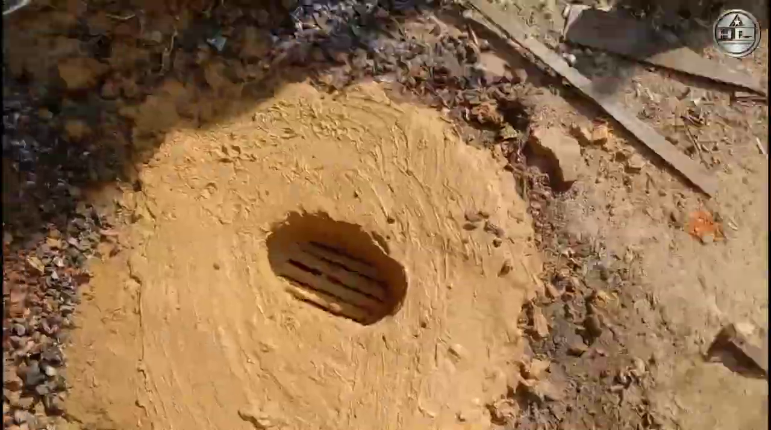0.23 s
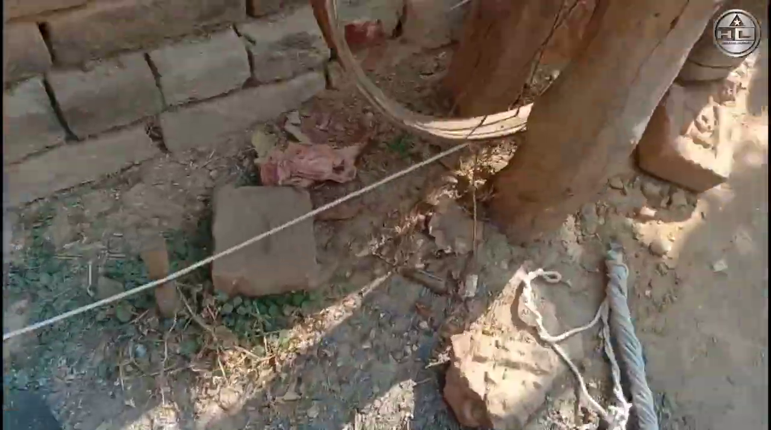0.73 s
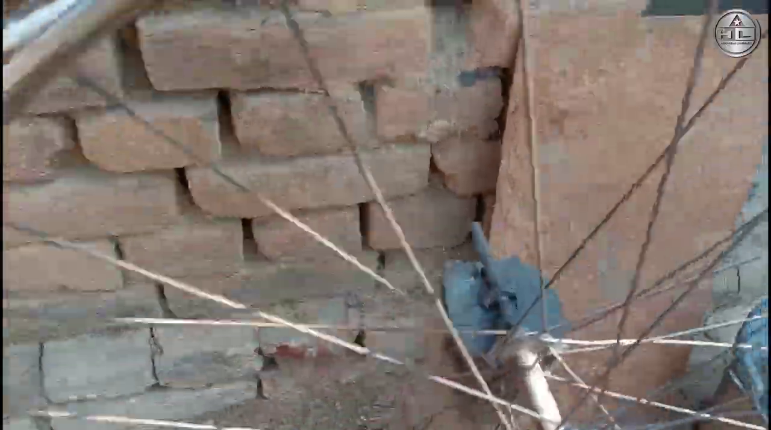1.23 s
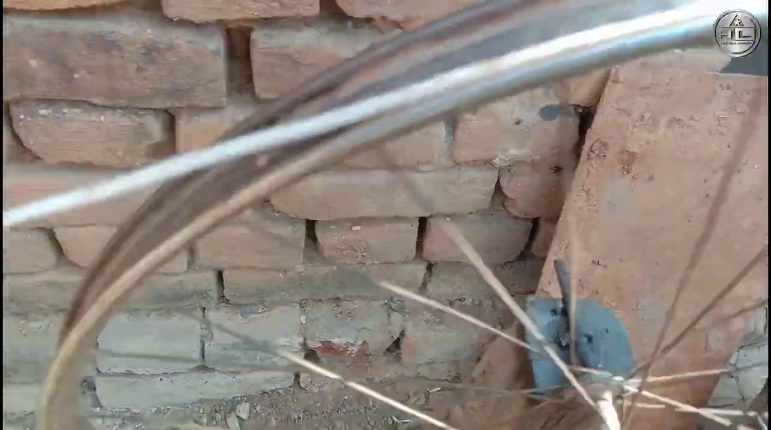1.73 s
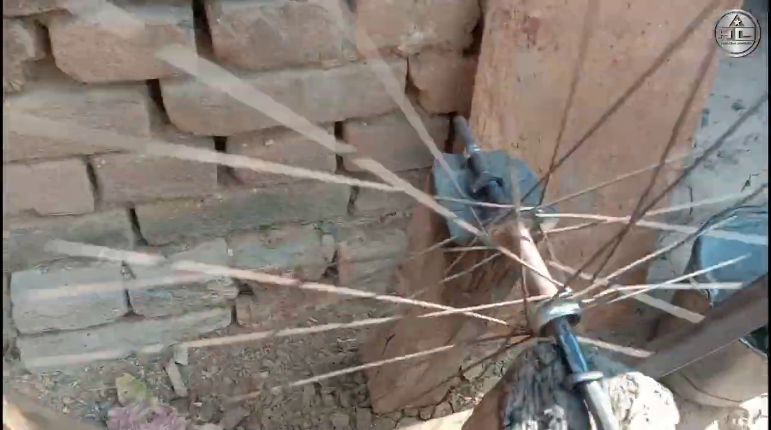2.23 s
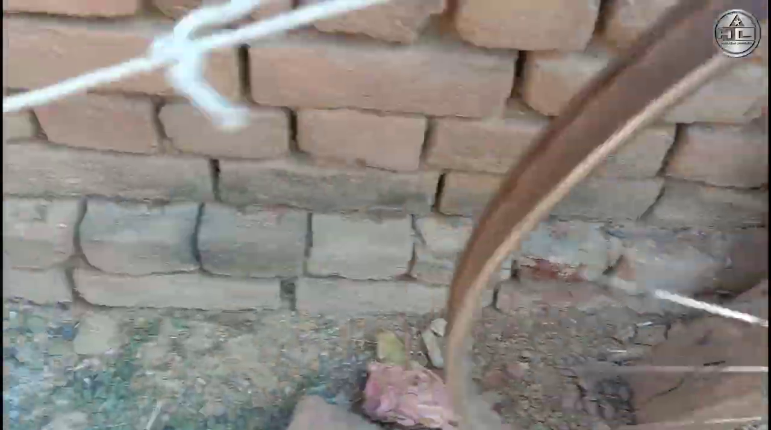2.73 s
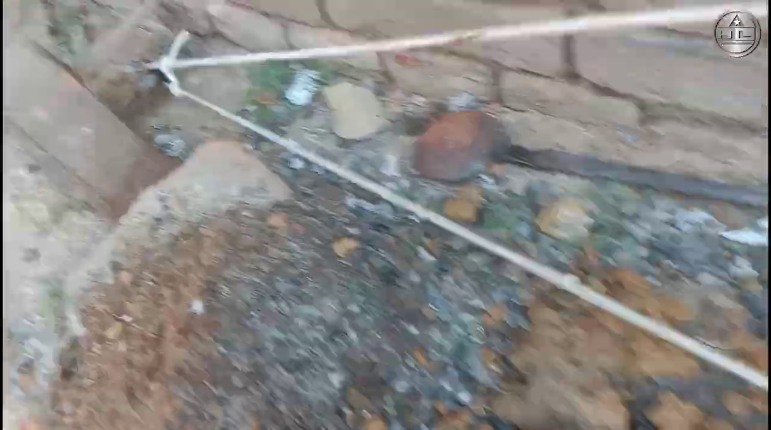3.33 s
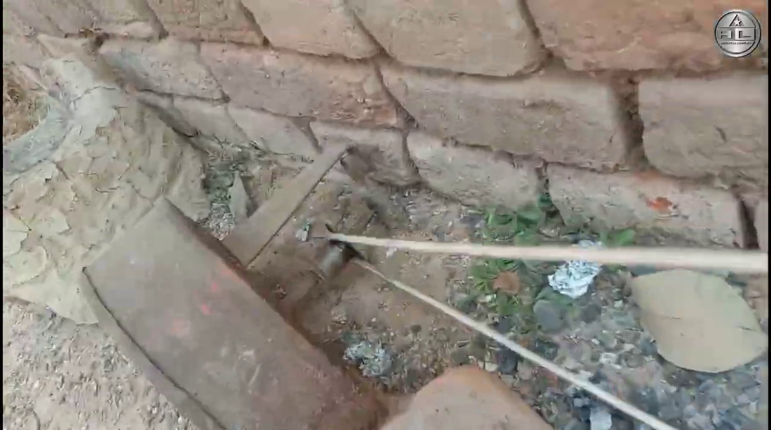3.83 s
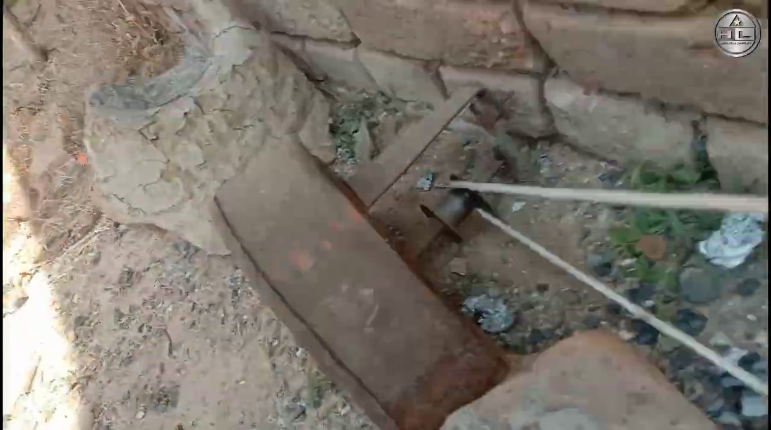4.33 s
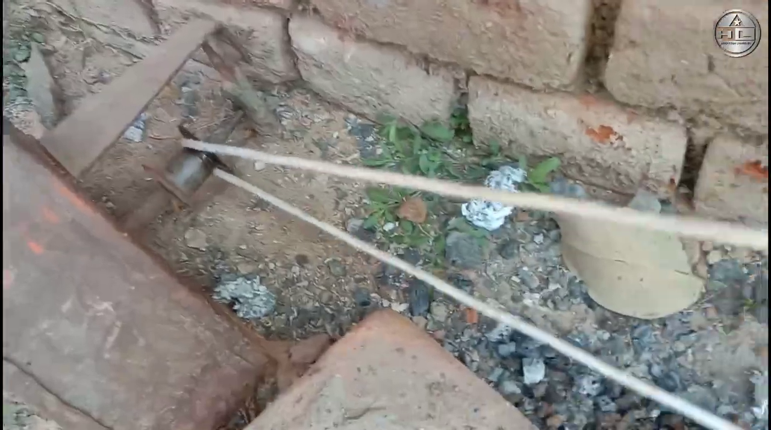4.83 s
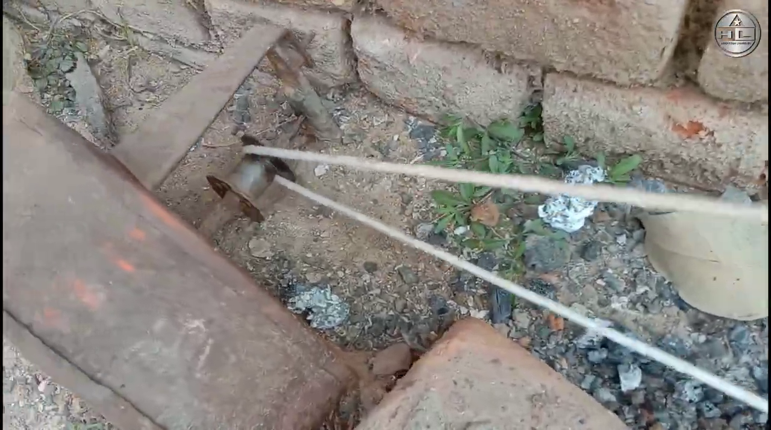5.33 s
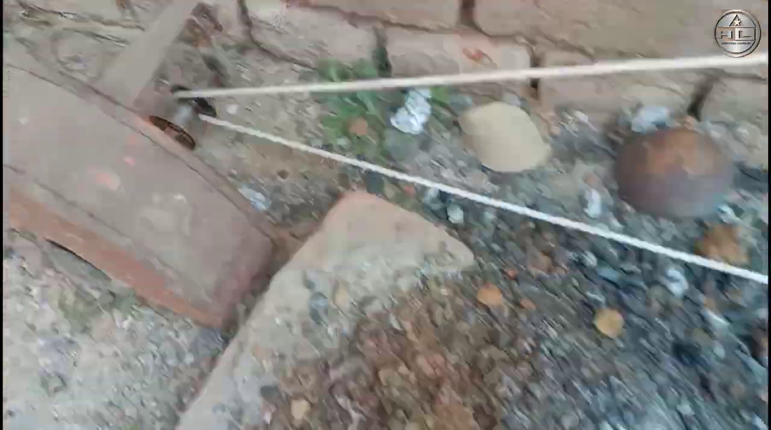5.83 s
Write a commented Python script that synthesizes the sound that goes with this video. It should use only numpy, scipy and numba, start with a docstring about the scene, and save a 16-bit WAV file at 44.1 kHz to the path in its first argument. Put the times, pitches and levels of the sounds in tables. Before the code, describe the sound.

A handheld microphone outdoors catches faint hiss, shoe scuffs and gritty clicks before a rickety metal blower whirs up. Paired knocks and thuds blur into a fast, dry, tinny clatter that surges three times, the last loudest, closest and raspiest, with bright bearing scrape. It winds down through slower rattling and small pings, stops, and leaves a faint squeak and light scuffs.

```python
"""A brick yard hisses faintly over a low rumble; grit ticks, feet and hands scuff, thin squeaks sound.
At 1.5 s a hand-cranked four-blade blower starts and spins up in three pushes, to 2.5, 3.4 and 4.3 s.
Once a turn its loose shaft strikes the steel housing (ringing modes) and falls back with a thud;
the bearing rasps (coloured rough noise), the housing rubs, blades hum (sines) and air rushes (noise).
As it slows a loose bit pings (paired sines); it stops at 5.5 s and a squeak and scuffs follow."""
import sys
import numpy as np
from scipy import signal
from scipy.fft import rfft, irfft
from scipy.io import wavfile
from scipy.ndimage import uniform_filter1d
from numba import njit

SR = 44100
rng = np.random.default_rng(int(sys.argv[2]) if len(sys.argv) > 2 else 0)


def store_wav(level_fs):
    """Save 16-bit WAV to argv[1]."""
    pcm = np.round(np.clip(np.atleast_2d(level_fs), -1, 1) * 32767)
    wavfile.write(sys.argv[1], SR, pcm.T.astype(np.int16))


def level_to_linear(level):
    """Convert decibel levels to linear amplitude factors, elementwise."""
    exponent = np.asarray(level, float) / 20
    return 10 ** exponent


N = 267731
TIME = np.arange(N) / SR


def unit(x):
    """Scale to rms 1."""
    return x / np.sqrt(np.mean(x ** 2))


def curve(table):
    """Columns of a table as functions of time."""
    time_s, *columns = np.transpose(table)
    return [np.interp(TIME, time_s, column) for column in columns]


def colour(x, points):
    """Filter by (freq_hz, gain_db) points, joined on a log frequency axis."""
    hz, db = np.transpose(points)
    freq_hz = np.maximum(np.arange(N // 2 + 1) * SR / N, 1)
    gain_db = np.interp(np.log(freq_hz), np.log(hz), db)
    return irfft(rfft(x) * level_to_linear(gain_db), N)


def band(x, hz, octaves):
    """Band-pass around hz."""
    edges_hz = np.minimum(hz * 2 ** (np.array([-.5, .5]) * octaves), SR / 2.1)
    return signal.sosfilt(signal.butter(2, edges_hz, "band", fs=SR, output="sos"), x)


def walk(rate_hz):
    """Random levels held 1 / rate_hz and slewed twice; rms 1."""
    hold = int(SR / rate_hz)
    steps = np.repeat(rng.standard_normal(N // hold + 1), hold)
    return unit(uniform_filter1d(uniform_filter1d(steps, hold), hold)[:N])


def swell(peak_s, rise_s, fall_s):
    """Exponential rise to 1 at peak_s, exponential fall after it."""
    return np.exp(np.where(TIME < peak_s, (TIME - peak_s) / rise_s, (peak_s - TIME) / fall_s))


def grit(spread_db):
    """Noise whose samples differ widely in size, as from a rough contact; rms 1."""
    return unit(rng.standard_normal(N) * level_to_linear(spread_db * rng.exponential(size=N)))


def law(speed, db_at_30, db_per_octave, knee, knee_db_per_octave):
    """Level against shaft speed (turns/s): one slope, with a further slope added below the knee."""
    speed = np.maximum(speed, 1)
    below_knee = np.minimum(np.log2(speed / knee), 0)
    return db_at_30 + db_per_octave * np.log2(speed / 30) + knee_db_per_octave * below_knee


def odd_turns(turns, table):
    """The columns of a table, each row held over the whole of its turn; zero elsewhere."""
    rows = np.zeros((len(table[0]) - 1, int(turns[-1]) + 2))
    for time_s, *row in table:
        rows[:, int(np.round(np.interp(time_s, TIME, turns)))] = row
    return uniform_filter1d(rows[:, (turns + .15).astype(int)], size=512, axis=1)


# shaft speed (time_s, speed_turns_per_s)
SHAFT_SPEED = [(1.5, 4.85), (1.66, 12.11), (1.8, 15.76), (2.17, 17.02), (2.43, 26.32), (2.56, 26.49),
               (2.87, 20.9), (3.05, 21.87), (3.36, 28.55), (3.48, 26.38), (3.59, 21.35), (3.7, 20.65),
               (4.12, 31.0), (4.3, 31.3), (4.42, 24.4), (4.52, 21.48), (4.85, 14.12), (5.3, 7.5),
               (5.6, 3.58)]
# gain as the microphone nears the housing (time_s, gain_db)
NEARNESS = [(1.5, -3.5), (2.0, -3.5), (2.5, -1), (3.15, -1), (3.45, 3.5), (3.8, 4.5), (4.25, 9), (4.6, 4),
            (5.0, 8), (5.5, 17)]
# turns that hit harder or softer (time_s, strike_db, thud_db, rasp_db)
UNEVEN_TURNS = [(1.54, 0, 7, 0), (1.84, 6.5, -0.5, 23), (2.14, 2, 2, 20), (2.25, 0, 6, -2),
                (2.924, 4, -11, 4), (2.346, -11, 4, -8), (2.876, -2, -4, -22), (3.063, 7.5, -15, 20.5),
                (3.149, -1, -12, -9), (3.23, 1.5, -28, 3.5), (3.486, -3.5, -22, -1),
                (3.616, -7.5, 1.5, -3.5), (3.711, -0.5, 2, 2), (3.845, 4, -1, 2), (3.885, -4, 4, 9),
                (4.259, 0, -2, 3.5), (4.227, 2, -2.5, -3), (4.291, -1.5, 1.5, -1.5), (4.325, -1.5, 3, 1),
                (4.36, 0, 3.5, -4), (4.44, 0.5, 5.5, -6), (4.401, -1.5, 1, -21), (4.527, -5, -2, -0.5),
                (4.626, 4.5, 0.5, 10), (3.927, -3, 1.5, 3.5), (4.575, 8.5, -10, 9), (4.68, -5, 0, 0),
                (4.738, 3.5, 1.5, 9), (5.12, -2, 2.5, -23), (5.36, 1.5, -0.5, -7)]
# strikes that come late (time_s, delay_s)
DELAYED_STRIKES = [(2.3, .005), (2.346, .005), (2.924, .002), (3.063, .002), (3.711, .003), (3.845, .002),
                   (4.575, .004)]


def blower():
    """Shaft angle times strike, thud, rasp and rub; its speed sets hum, air and buffeting."""
    stop_s, start_turn, thud_early_s = 5.5, .07, .0068
    speed = curve(SHAFT_SPEED)[0] * (TIME >= SHAFT_SPEED[0][0]) * (TIME < stop_s)
    turns = start_turn + np.cumsum(speed) / SR
    octaves = np.log2(np.maximum(speed, 1) / 30)
    strike_odd_db, thud_odd_db, rasp_odd_db = odd_turns(turns, UNEVEN_TURNS)
    thrown = turns - odd_turns(turns, DELAYED_STRIKES)[0] * speed
    # the faster it spins, the earlier in the turn it drops back
    dropped = turns + thud_early_s * speed
    poles = shell()
    blows = level_to_linear(strike_odd_db) * strike(speed, thrown, poles)
    blows = blows + level_to_linear(thud_odd_db) * thud(speed, dropped, poles)
    steady = rub(speed, turns, thrown, poles) + hum(turns, octaves) + air(speed) + buffet(octaves)
    total = level_to_linear(curve(NEARNESS)[0]) * (blows + steady) + rasp(thrown, dropped, rasp_odd_db)
    return total * uniform_filter1d(1. * (speed > 0), size=1024)


def contact(turns, at_turn, lead_s, drag_s, blow, push_s, judder_hz, scatter_db, scatter_s):
    """Once a turn: grinding leads in, a juddering blow, chatter dies away; size and timing vary."""
    whole = np.arange(int(turns[-1]) + 1)
    chance = rng.standard_normal((len(whole), 2))
    times_s = np.interp(whole + at_turn, turns, TIME) + scatter_s * chance[:, 0]
    marks = np.zeros(N)
    marks[np.clip((times_s * SR).astype(int), 0, N - 1)] = level_to_linear(scatter_db * chance[:, 1])
    lag_s = np.arange(-2048, 2049) / SR
    grind = np.exp(np.where(lag_s < 0, lag_s / lead_s, -lag_s / drag_s))
    push = blow * np.exp(-(lag_s / push_s) ** 2) * np.cos(2 * np.pi * judder_hz * lag_s)
    chatter = signal.fftconvolve(marks, grind, "same") * grit(1.1)
    return chatter + signal.fftconvolve(marks, push, "same")


@njit
def resonate(force, pole):
    """One mode whose pitch may move from sample to sample."""
    out, z = np.empty(len(force)), 0j
    for i in range(len(force)):
        z = z * pole[i] + force[i]
        out[i] = z.imag
    return out


# housing modes, relative gains (pitch_hz, t60_s, strike_db, thud_db, rub_db)
HOUSING_MODES = [(262, 0.0061, -16, -20.5, 7), (374.3, 0.061, -27, -33.5, -4.5),
                 (404, 0.0064, 11.5, -1, -15.5), (498, 0.031, -23, 1.5, -32.5), (565, .04, -.5, 0, -2),
                 (635, .045, -3, -2, -1), (915, .05, 1, -9, -9), (1069, 0.039, -1.5, -13, -7.5),
                 (1127, 0.0097, -9, -20.5, -18.5), (1402, 0.028, -9, -21, -14),
                 (1292, 0.0039, 8, -3.5, 1.5), (1600, 0.03, -25.5, -16, -14.5),
                 (2045, 0.0017, -32.5, -50.5, -2.5), (2300, 0.012, -15, -18.5, -8.5),
                 (2755, 0.0132, -21.5, -76.5, -24), (3960, 0.028, -13.5, -43.5, -22.5),
                 (5670, 0.00624, -13.5, -37.5, -22)]


def shell():
    """Turn and loss per sample of each mode; the loose shell shifts their pitch, higher ones more."""
    poles = []
    for hz, t60_s, *_ in HOUSING_MODES:
        wander = .012 * min(hz / 1000, 2) * walk(20)  # share of the pitch
        poles.append(np.exp(2j * np.pi * hz * (1 + wander) / SR - np.log(1000) / (t60_s * SR)))
    return poles


# relative gain of the housing modes between 1 and 1.5 kHz (time_s, gain_db)
UPPER_MODE_GAIN = [(1.6, 4.5), (2.4, 5), (2.8, 4.5), (3.5, -0.5), (5.2, -1.5)]


def ring(force, poles, column):
    """Housing modes driven by a force, gains from one column; no two contacts shake them alike."""
    out, upper_db = 0, curve(UPPER_MODE_GAIN)[0]
    for k, mode in enumerate(HOUSING_MODES):
        shake_db = min(mode[0] / 600, 2.2) * walk(30) + upper_db * (1000 < mode[0] < 1500)
        out = out + (-1) ** k * level_to_linear(mode[column]) * resonate(force * level_to_linear(shake_db), poles[k])
    # a small open shell radiates little bass, and rust damps the top
    return unit(signal.sosfilt(signal.butter(4, [330, 7800], "band", fs=SR, output="sos"), out))


def strike(speed, thrown, poles):
    """The loose shaft is thrown against the housing, which rings."""
    level_db = law(speed, db_at_30=-37.5, db_per_octave=-3, knee=19, knee_db_per_octave=37)
    force = contact(thrown, at_turn=0, lead_s=.0006, drag_s=.0075, blow=1.2, push_s=.001,
                    judder_hz=780, scatter_db=1.2, scatter_s=.0007)
    return level_to_linear(level_db) * ring(force, poles, column=2)


def thud(speed, dropped, poles):
    """The shaft falls back about half a turn later, a slower and softer blow."""
    level_db = law(speed, db_at_30=-38, db_per_octave=-.5, knee=13, knee_db_per_octave=22)
    force = contact(dropped, at_turn=.47, lead_s=.005, drag_s=.009, blow=.38, push_s=.0026,
                    judder_hz=585, scatter_db=.76, scatter_s=.001)
    return level_to_linear(level_db) * ring(force, poles, column=3)


# colour of the bearing scrape (freq_hz, density_db_per_hz)
SCRAPE_COLOUR = [(1500, -23), (2300, 15), (3200, -13), (4200, -1), (6000, -10), (7900, -16.5), (8800, -1),
                 (10000, -6), (11500, -6), (13500, -5), (15000, -22), (15800, -36)]
# scrape as the shaft is thrown, before the resonances (time_s, level_db)
SCRAPE_LEVEL = [(1.5, -100), (2.2, -88), (2.6, -50.5), (3.14, -72), (3.22, -43), (3.75, -42.5),
                (4.05, -40.5), (4.24, -24.5), (4.45, -33.5), (4.62, -45.5), (4.7, -78), (5.3, -90)]
# duller scrape as it drops back, before the resonances (time_s, level_db)
DROP_LEVEL = [(1.5, -80), (2.5, -61), (3.14, -93), (3.3, -52.5), (3.9, -50.5), (4.24, -39), (4.6, -47.5),
              (4.8, -56), (5.2, -62), (5.45, -72)]
# bearing resonances (centre_hz, width_hz, gain_db)
BEARING_MODES = [(3350, 160, 1), (4150, 120, 7.5), (4900, 150, 2.5), (5470, 180, 2), (6350, 200, 4),
                 (9540, 1570, -8.5)]


def rasp(thrown, dropped, odd_db):
    """The bearing scrapes as the shaft is thrown against it and as it drops back, and resonates."""
    scrape = contact(thrown, at_turn=.02, lead_s=.0015, drag_s=.0065, blow=1.2, push_s=.00003,
                     judder_hz=9000, scatter_db=2.2, scatter_s=.0015)
    scrape = level_to_linear(curve(SCRAPE_LEVEL)[0] + odd_db) * unit(colour(scrape, SCRAPE_COLOUR))
    drop = contact(dropped, at_turn=.47, lead_s=.002, drag_s=.005, blow=.8, push_s=.00003,
                   judder_hz=9000, scatter_db=2.5, scatter_s=.002)
    drop = band(colour(drop, SCRAPE_COLOUR), 6400, .9)
    both = scrape + level_to_linear(curve(DROP_LEVEL)[0]) * unit(drop)
    rings = sum(level_to_linear(db + 1.1 * walk(40)) * band(both, hz, width_hz / hz)
                for hz, width_hz, db in BEARING_MODES)
    # each scrape has its own colour and catches again here and there
    centres_hz = 2000 * 2 ** np.arange(0, 3.2, .4)
    return .7 * sum(level_to_linear(2.1 * walk(100)) * band(both + rings, hz, .4) for hz in centres_hz)


def rub(speed, turns, thrown, poles):
    """Rough rubbing rings the housing; swells with each blade, slackens just before each strike."""
    level_db = law(speed, db_at_30=-30.5, db_per_octave=9.5, knee=14.5, knee_db_per_octave=25)
    blade_db = 1.6 * np.cos(8 * np.pi * turns)
    slack_db = -18 * (thrown % 1) ** 3
    force = grit(1.8) * level_to_linear(blade_db + slack_db + 2.5 * walk(40))
    return level_to_linear(level_db) * ring(force, poles, column=4)


# blade hum at 30 turns/s, before nearness (multiple_of_shaft_speed, level_db)
BLADE_HUM = [(4, -52), (5, -58), (6, -58), (7, -59), (8, -57), (10, -51), (11, -49), (12, -47), (13, -49),
             (14, -50), (15, -48)]


def hum(turns, octaves):
    """Blade tones at multiples of shaft speed, 38 dB per octave of speed."""
    out = 0
    for multiple, db in BLADE_HUM:
        tone = np.sin(2 * np.pi * (multiple * turns + rng.random()))
        out = out + level_to_linear(db + 38 * octaves + 1.2 * walk(12)) * tone
    return out


# colour of rushing air and yard hiss (freq_hz, density_db_per_hz)
HISS_COLOUR = [(120, -55), (200, -29.5), (321, -23), (392, -5.5), (585, -10.5), (827, -9.5), (940, -8.5),
               (1070, -14), (1980, -8), (2650, -10.5), (3550, -20.5), (4410, -10), (5010, -10.5),
               (10200, -19.5), (15500, -54.5)]


def air(speed):
    """Air rush: coarse noise that grows with speed."""
    level_db = law(speed, db_at_30=-59, db_per_octave=6.5, knee=16, knee_db_per_octave=24)
    return level_to_linear(level_db + 2 * walk(54)) * unit(colour(grit(2.4), HISS_COLOUR))


def buffet(octaves):
    """Blades buffet the air: low noise, 13.3 dB per octave of speed."""
    return level_to_linear(-65 + 13.3 * octaves + 2 * walk(20)) * unit(band(rng.standard_normal(N), 110, 3.4))


# bright metal pings (start_s, pitch_hz, level_db, t60_s)
METAL_PINGS = [(4.835, 7150, -49, 0.066), (4.857, 12200, -50, 0.022), (4.893, 6560, -59, .08),
               (5.1039, 11800, -60, 0.022), (5.236, 7180, -57, 0.1)]


def pings():
    """A loose bit of metal rings briefly, a close pair of tones that fades."""
    out, lag_s = np.zeros(N), np.arange(4096) / SR
    for start_s, hz, db, t60_s in METAL_PINGS:
        pair = np.sin(2 * np.pi * hz * lag_s) + .6 * np.sin(2 * np.pi * 1.013 * hz * lag_s)
        fade = level_to_linear(db - 60 * lag_s / t60_s) * np.minimum(lag_s / .001, 1)
        start = int(start_s * SR)
        out[start:start + len(lag_s)] += fade * pair
    return out * level_to_linear(4.2 * walk(200))


# grit ticks (start_s, peak_db, centre_hz)
GRIT_TICKS = [(0.031, -39, 2130), (0.04, -43, 1550), (0.051, -45, 2190), (0.07, -56, 2310),
              (0.09, -44, 2300), (0.117, -45.5, 2100), (0.4389, -58, 2220), (0.681, -50, 2300),
              (0.688, -34, 1760), (0.699, -45, 2250), (0.751, -40.5, 2040), (0.769, -45, 2060),
              (0.8276, -50, 2300), (1.0854, -50, 2320), (1.2218, -48, 2760), (1.344, -51, 4040),
              (1.4077, -54, 4890), (1.9623, -37.5, 2400), (2.9963, -27.5, 1300), (5.794, -55, 2530)]


def ticks():
    """Grit snaps under foot: a click with a short rough tail."""
    out, lag_s = np.zeros(N), np.arange(1024) / SR
    for start_s, db, hz in GRIT_TICKS:
        tail = np.exp(-lag_s / .0044) * rng.standard_normal(len(lag_s))
        tick = band(tail + 4 * (lag_s == 0), hz, 1.73)
        start = int(start_s * SR)
        out[start:start + len(lag_s)] += level_to_linear(db) * tick / np.abs(tick).max()
    return out


# scuffs, level at the top of the swell (peak_s, level_db, rise_s, fall_s, centre_hz)
DRAGS = [(0.022, -50, 0.1, 0.027, 2240), (.69, -54, 0.043, 0.006, 2300), (.80, -62.5, 0.022, 0.062, 3130),
         (1.069, -58.5, 0.0053, 0.0064, 3370), (1.15, -48, 0.0097, 0.0092, 2780),
         (1.26, -62, 0.085, 0.021, 2780), (1.414, -61.5, 0.0054, 0.03, 3930),
         (1.777, -44.5, 0.025, 0.034, 4500), (1.963, -35.5, 0.00052, 0.02, 4900),
         (2.029, -52, 0.012, 0.037, 5460), (2.832, -42.5, 0.02, 0.022, 5560),
         (5.239, -54, 0.003, 0.029, 4900), (5.563, -55, 0.0046, 0.021, 6300),
         (5.889, -59.5, 0.01, 0.018, 6640), (6.03, -58, 0.023, 0.0039, 4300)]
# wheel resonances shaken by a scuff (centre_hz, width_hz, gain_db)
WHEEL_MODES = [(2350, 300, 2.5), (3600, 200, -3), (5330, 260, -1), (6330, 300, -5.5), (7180, 200, 0)]
# low handling thumps, level at the top of the swell (peak_s, level_db)
HANDLING_THUMPS = [(0.569, -69), (1.107, -63.5), (1.402, -64.5), (1.513, -56.5), (5.569, -66.5)]


def scuffs():
    """Feet and hands drag over dirt and wood and shake the wheel; handling thumps low."""
    rough = grit(2.8) * level_to_linear(2.5 * walk(150))
    low = unit(band(rng.standard_normal(N), 170, 2.5))
    rings = sum(level_to_linear(db + 4.9 * walk(40)) * band(rough, hz, width_hz / hz)
                for hz, width_hz, db in WHEEL_MODES)
    shaken = rough + 3 * rings
    out = np.zeros(N)
    for peak_s, db, rise_s, fall_s, hz in DRAGS:
        drag = unit(band(band(shaken, hz, 2.03), hz, 2.03))
        out += level_to_linear(db) * swell(peak_s, rise_s, fall_s) * drag
    for peak_s, db in HANDLING_THUMPS:
        out += level_to_linear(db) * swell(peak_s, .0052, .06) * low
    return out


# squeaks, before flutter and arch (start_s, length_s, start_hz, end_hz, level_db)
THIN_SQUEAKS = [(0.756, 0.071, 1370, 1350, -65), (0.972, 0.14, 1960, 1920, -60.5),
                (1.5, 0.075, 1500, 1650, -62), (1.553, 0.037, 1830, 1850, -62),
                (5.667, 0.13, 3980, 3470, -75.5)]


def squeaks():
    """Thin gliding tones, arched in the middle, that flutter in level and pitch."""
    out, flutter, waver = np.zeros(N), level_to_linear(4 * walk(120)), 1 + .018 * walk(250)
    for start_s, length_s, start_hz, end_hz, db in THIN_SQUEAKS:
        span = (TIME >= start_s) & (TIME < start_s + length_s)
        part = (TIME[span] - start_s) / length_s
        arch = 1 + .02 * np.sin(np.pi * part ** 1.5)
        pitch_hz = waver[span] * arch * (start_hz + (end_hz - start_hz) * part)
        phase = 2 * np.pi * np.cumsum(pitch_hz) / SR
        out[span] += level_to_linear(db) * np.sin(np.pi * part) ** .5 * np.sin(phase)
    return out * flutter


# yard hiss (time_s, level_db)
HISS_LEVEL = [(0, -53.5), (.15, -73), (.4, -65), (.47, -72.5), (.62, -63), (.73, -69), (.95, -74.5),
              (1.2, -68), (1.38, -73), (1.7, -69), (5.2, -77), (6.07, -70.5)]


def yard():
    """Outdoor hiss in narrow bands, each flickering on its own, over a faint low rumble."""
    hiss = colour(grit(.65), HISS_COLOUR)
    bands = sum(level_to_linear(3 * walk(25)) * band(hiss, hz, 430 / hz) for hz in np.arange(300, 15500, 300))
    rumble = level_to_linear(-79.5 + 3 * walk(15)) * unit(band(rng.standard_normal(N), 160, 1.3))
    return level_to_linear(curve(HISS_LEVEL)[0]) * unit(bands) + rumble


def scene():
    """All sources at one microphone."""
    return (blower() + pings() + ticks() + scuffs() + squeaks() + yard())[None]


def band_limit(x):
    """A steep low-pass at the top of the band."""
    return signal.sosfilt(signal.butter(12, 15840, fs=SR, output="sos"), x)


def record(dry):
    """The microphone's sound port rings near 2.3 kHz; bass and top are cut."""
    port = dry + .25 * band(dry, 2353, .2)
    lean = signal.sosfilt(signal.butter(3, 95, "high", fs=SR, output="sos"), port)
    cut = signal.sosfilt(signal.ellip(10, .2, 80, 15500, fs=SR, output="sos"), lean)
    return band_limit(cut)


dry = scene()
out = record(dry)
store_wav(out)
```